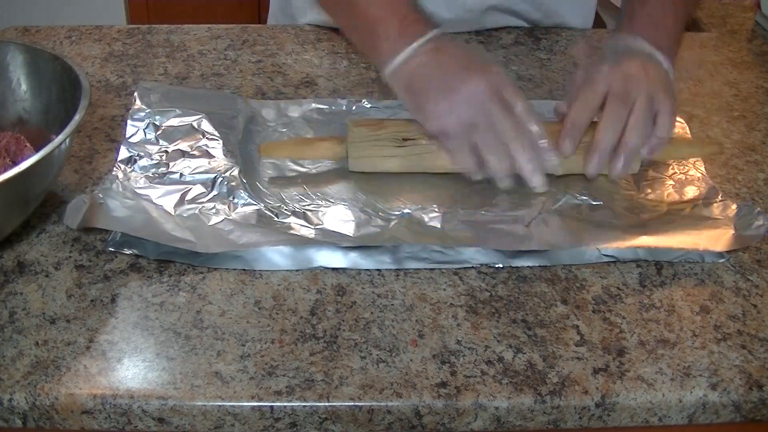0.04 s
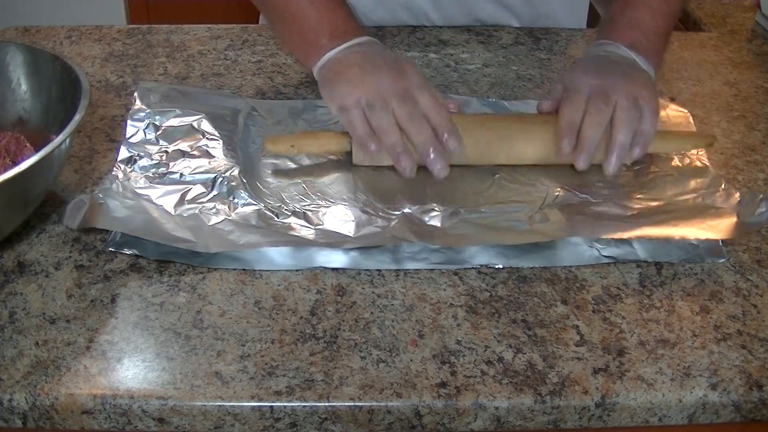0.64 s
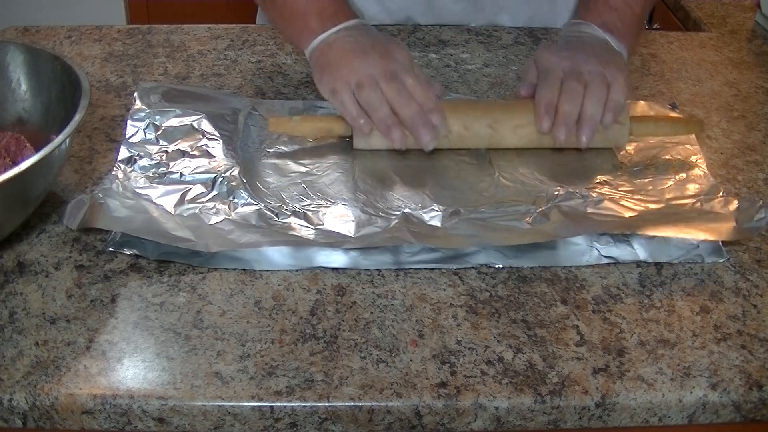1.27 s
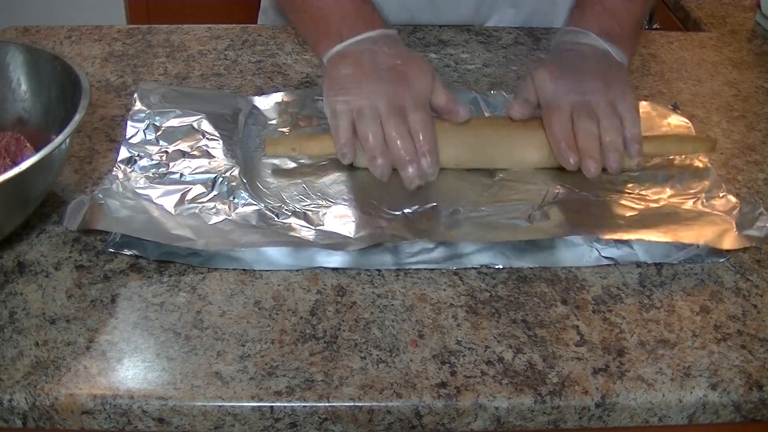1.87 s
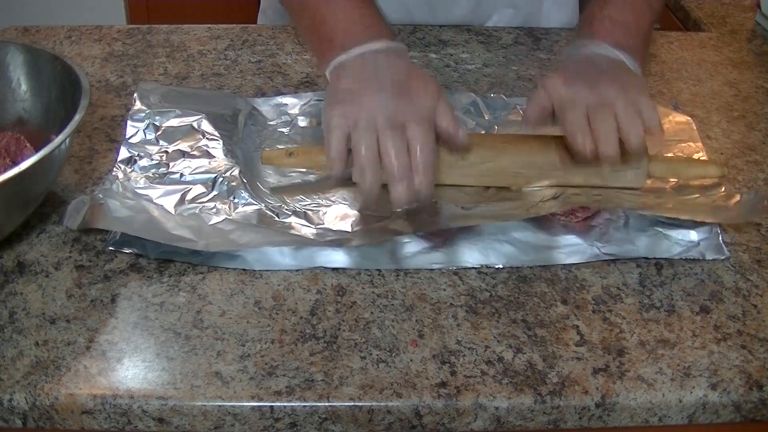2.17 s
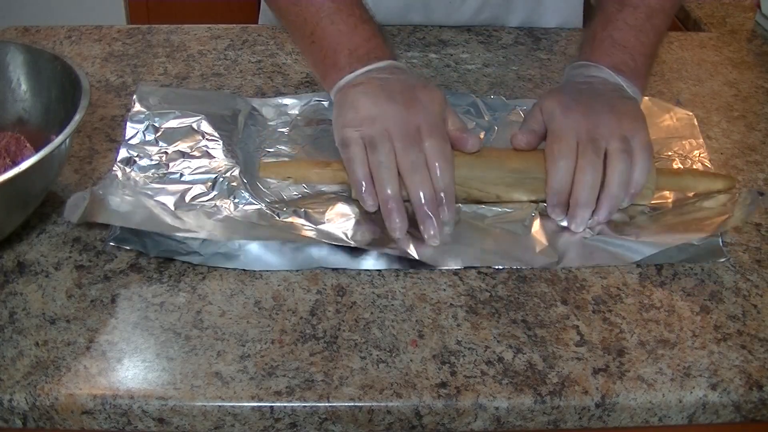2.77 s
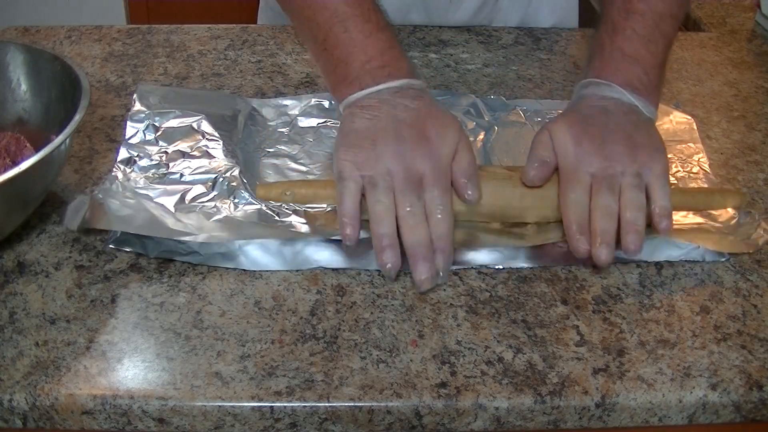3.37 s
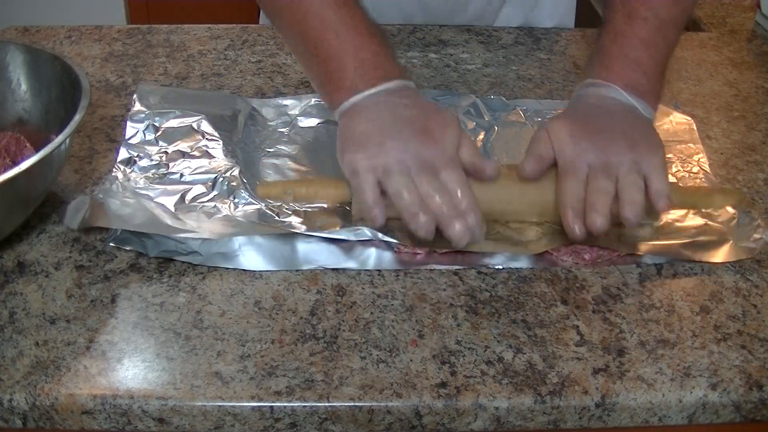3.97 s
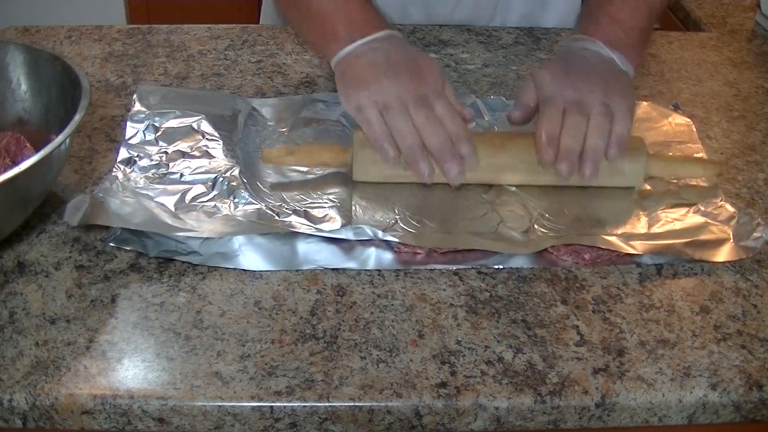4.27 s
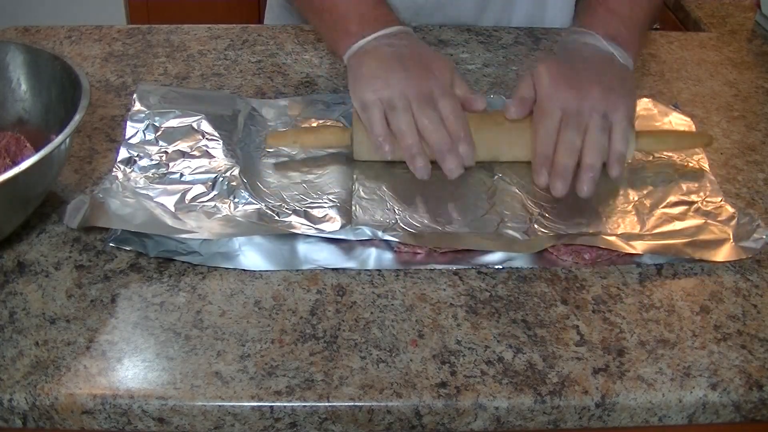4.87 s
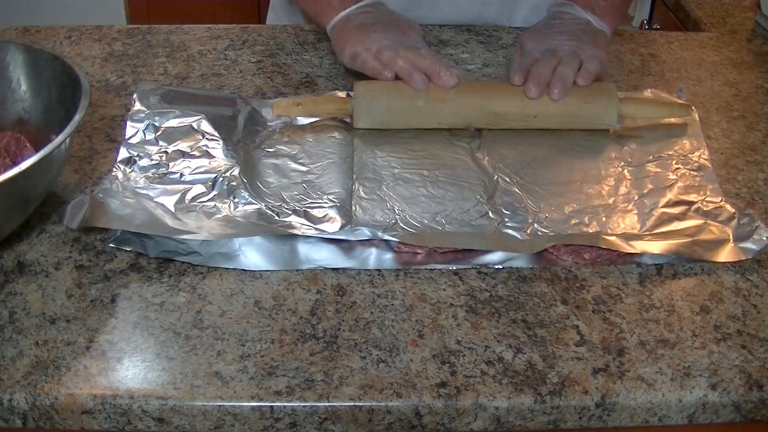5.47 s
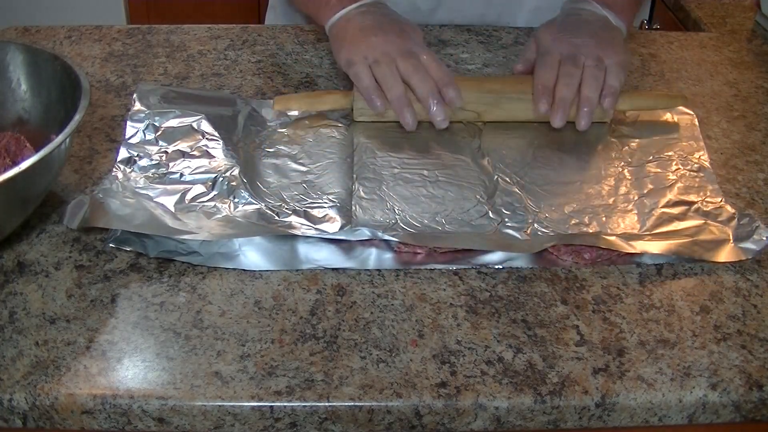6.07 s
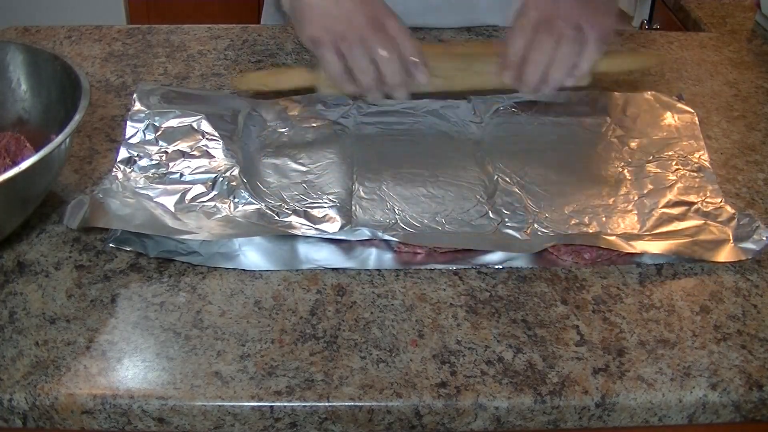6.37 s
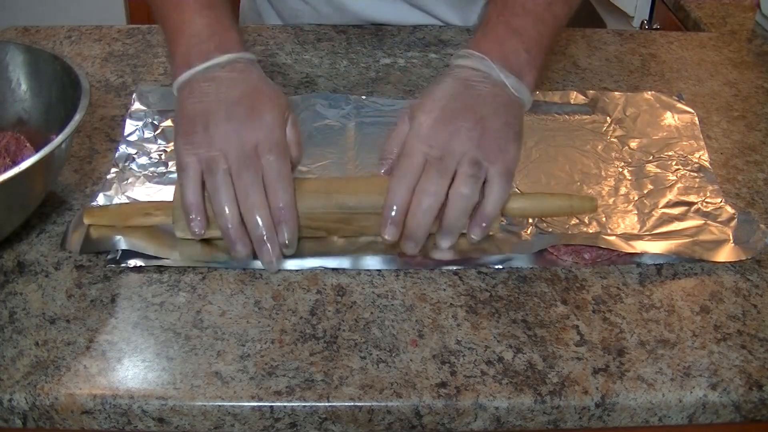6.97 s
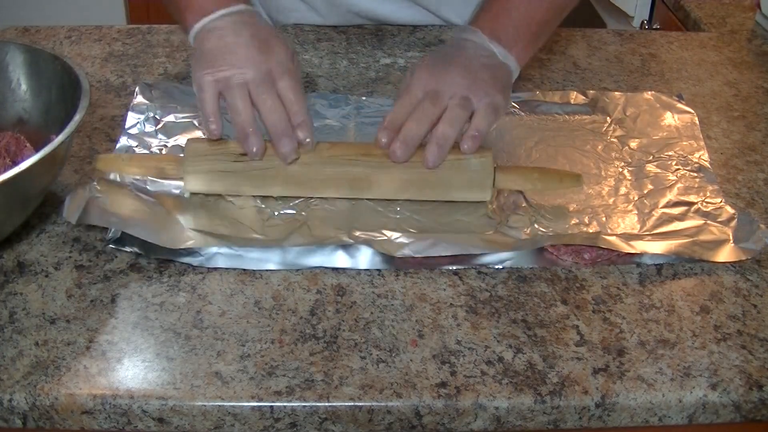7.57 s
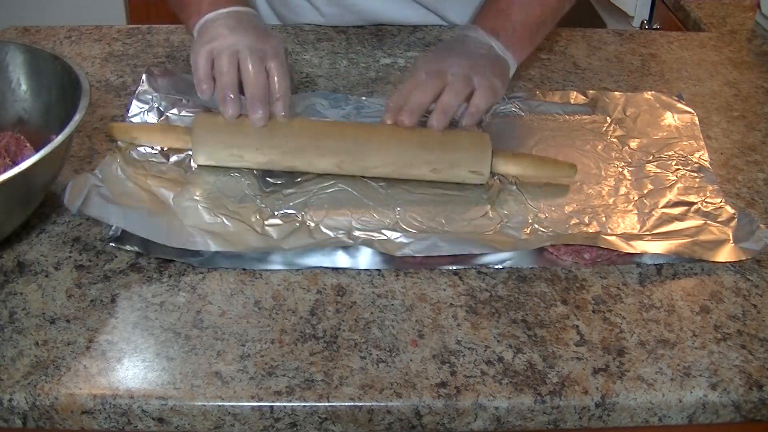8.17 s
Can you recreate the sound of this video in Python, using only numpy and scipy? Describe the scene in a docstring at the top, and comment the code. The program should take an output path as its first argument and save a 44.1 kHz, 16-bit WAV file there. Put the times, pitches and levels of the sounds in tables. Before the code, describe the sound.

Close to the microphone, aluminium foil crinkles in uneven surges as a rolling pin presses meat flat on a kitchen counter. Creases click and buckle, with a quiet wet crackle and a few soft bumps of the pin. Near the end the pin lifts for half a second, then comes down and the crinkling resumes. A fan runs quietly throughout, and hard walls add a slight echo.

```python
"""A wooden rolling pin works meat between two sheets of aluminium foil on a kitchen counter.
From the first push, each stroke crinkles the foil in showers of tiny crease flips; the sheet buckles,
snaps and squeaks, the meat squelches and pops beneath it, and now and then the pin bumps down.
At 6.3 s the pin lifts and the crinkle stops; half a second later it lands for a few last strokes.
A fan runs steadily throughout, and the hard kitchen walls echo the work."""
import sys
import numpy as np
from scipy import signal
from scipy.fft import rfft, irfft
from scipy.io import wavfile
from scipy.ndimage import uniform_filter1d

SR = 44100
rng = np.random.default_rng(int(sys.argv[2]) if len(sys.argv) > 2 else 0)


def wav_record(signal):
    """Record a signal, one row per channel, as 16-bit PCM in the file named by sys.argv[1]."""
    frames = np.transpose(np.atleast_2d(signal))
    bounded = np.clip(frames, -1, 1)
    # unit amplitude maps onto the largest positive 16-bit level
    quanta = np.round(bounded * 32767).astype(np.int16)
    wavfile.write(sys.argv[1], SR, quanta)


N = 362943
TIME = np.arange(N) / SR
SIDES = np.array([[1], [-1]])  # plus on the left, minus on the right
# the ring of the foil sheet: f/Hz, level/dB
FOIL_RING = [(60, -32), (130, -26), (280, -61), (500, -22), (1000, -13.5), (1500, -7.5), (2200, -3),
             (3500, -3.5), (4600, -2), (5700, -1.5), (6600, -4), (10200, -1.2), (12000, -6.5),
             (15000, -18.5)]


def amp(db):
    """Decibels to gain."""
    return 10 ** (np.asarray(db) / 20)


def unit_rms(x):
    """Scales to an rms of one."""
    return x / np.sqrt(np.mean(x ** 2) + 1e-20)


def curve_at(points, hz):
    """Reads a curve on a log-frequency axis."""
    f, value = np.transpose(points)
    return np.interp(np.log(hz + 1), np.log(f + 1), value)


def add(mix, s, sound):
    """Mixes a sound in at s seconds."""
    part = mix[:, max(round(s * SR), 0):][:, :sound.shape[-1]]
    part += sound[..., :part.shape[1]]


def coloured(x, spectrum, size=2048):
    """Minimum-phase EQ that keeps the power of white noise."""
    log_gain = np.log(amp(curve_at(spectrum, abs(np.fft.fftfreq(size, 1 / SR)))))
    taps = np.fft.ifft(np.exp(np.conj(signal.hilbert(log_gain)))).real[:size // 2]
    return signal.oaconvolve(x, taps[None] / np.linalg.norm(taps), axes=1)[:, :x.shape[1]]


def brightened(x, treble_db, split_hz=7500):
    """Fine creases ring high, broad folds lower: sets the treble's share of the power."""
    low = signal.sosfiltfilt(signal.butter(2, split_hz, fs=SR, output="sos"), x)
    high = x - low
    share = np.clip(amp(treble_db) ** 2, .02, .9)
    return (np.sqrt(1 - share) * low / low.std() + np.sqrt(share) * high / high.std()) * x.std()


def click(hz, cycles, size=400):
    """A tiny tone burst that peaks after the given cycles and dies at once."""
    turns = np.arange(size) / SR * hz
    return np.cos(2 * np.pi * (turns - cycles)) * (turns / cycles * np.exp(1 - turns / cycles)) ** 2


def crinkle(level_db=-2.5):
    """The foil creases under the moving pin."""
    db, treble_db, _ = rolling()
    activity = avalanches(per_s=80, spread_db=5, length_s=0.0085, steady=0.4)
    flips = shower(activity, per_s=5500, spread_db=3, crack_s=0.00014, flutter_s=0.00083, pan_db=1)
    grains = coloured(flips, FOIL_RING) + ticks()
    flare_db = 2.9 * np.log(activity)  # a strong avalanche flips finer creases and sounds brighter
    return brightened(grains, treble_db + flare_db) * amp(db + level_db)


def rolling(lift_s=6.3, land_s=6.805, turning_db=-60, seep_db=-57):
    """The pin's strokes ride crinkle level, treble share and squelch level (dB); the strongest leads."""
    # pushes and pulls: start/s, hardest press/s, end/s, crinkle/dB, swell/dB, treble share/dB, squelch/dB
    strokes = [(0.0, 0.096, 0.24, -33, 9, -3, -48), (0.451, 0.582, 0.91, -36.5, 4.5, -4.5, -55.5),
               (0.756, 0.786, 0.9, -31.5, 7.5, -3.5, -50), (1.252, 1.399, 1.46, -27.5, 16, -3.5, -44.5),
               (1.446, 1.492, 1.624, -32, 11, -3, -49), (1.823, 2.069, 2.146, -24, 12, -3.5, -46.5),
               (2.418, 2.53, 2.6, -30.5, 14.5, -4, -46.5), (2.54, 2.554, 2.77, -24.5, 3.5, -2.5, -50),
               (2.854, 3.275, 3.456, -30, 4, -4, -51.5), (3.56, 3.79, 3.836, -38.5, 3, -3, -51.5),
               (3.98, 4.276, 4.44, -36, 7.5, -2.5, -48.5), (4.397, 4.437, 4.56, -30, 21.5, -1.5, -47.5),
               (4.878, 5.08, 5.28, -35.5, 1.5, -3.5, -52), (5.246, 5.582, 5.59, -35, 3, -5, -51),
               (5.963, 5.98, 6.09, -32, 11.5, -4, -47), (6.834, 6.914, 7.037, -27, 9, -1.5, -41.5),
               (7.181, 7.27, 7.42, -34.5, 0.5, -3.5, -51), (7.457, 7.517, 7.5, -27, 7, -2.5, -47),
               (7.797, 7.815, 7.885, -33.5, 9, -3.5, -58), (7.99, 8.063, 8.18, -30.5, 2.5, -3.5, -45.5)]
    pressure = np.array([press(start, peak, end, swell) for start, peak, end, _, swell, _, _ in strokes])
    _, _, _, foil_db, _, treble_db, squelch_db = np.transpose(strokes)
    foil = foil_db[:, None] + pressure
    treble = treble_db[:, None] + 0.18 * np.maximum(pressure, -30)  # duller as the hands ease off
    lead_treble = treble[foil.argmax(0), np.arange(N)]
    squelch = squelch_db[:, None] + 0.58 * pressure  # soft meat follows the pressure only in part
    lifted = (TIME > lift_s) & (TIME < land_s)
    # between strokes the foil stirs faintly as the pin turns round, and the meat seeps
    crinkle_db = np.where(lifted, -np.inf, np.maximum(foil.max(0), turning_db))
    meat_db = np.where(lifted, seep_db, np.maximum(squelch.max(0), seep_db))
    return crinkle_db, uniform_filter1d(lead_treble, size=800), meat_db


def press(start, hardest, end, swell_db, wake_db_per_s=328, settle_db_per_s=143):
    """One stroke's envelope in dB: the hands lean in and ease off, then the foil settles."""
    held = np.interp(TIME, [start, hardest, end], [-swell_db, 0, -swell_db])
    attack = wake_db_per_s * np.maximum(start - TIME, 0)
    release = settle_db_per_s * np.maximum(TIME - end, 0)
    return held - attack - release


def avalanches(per_s, spread_db, length_s, steady):
    """Creases set each other off: the activity leaps at random moments and runs out."""
    sizes = amp(spread_db * np.minimum(rng.exponential(1, N), 2.3))
    kicks = sizes ** 2 * (rng.random(N) < per_s / SR)
    power = signal.lfilter([1], [1, -np.exp(-2 / (length_s * SR))], kicks)
    return np.sqrt(power / power.mean() + steady)


def shower(activity, per_s, spread_db, crack_s, flutter_s, pan_db, spots=40, window=3000):
    """Flips at random moments, mostly tiny and a few large, from many spots on the sheet."""
    out = np.zeros((2, N))
    for _ in range(spots):
        sizes = np.zeros(N)
        at = np.flatnonzero(rng.random(N) < per_s / spots / SR)
        sizes[at] = amp(spread_db * np.minimum(rng.exponential(1, N)[at], 4)) * activity[at]
        grain = flip(crack_s * rng.uniform(0.45, 1.6), flutter_s, flutter_db=-10.5, width=0.44)
        pan = amp(pan_db * rng.uniform(-0.93, 1) * SIDES)
        out += signal.oaconvolve(sizes[None], grain, axes=1)[:, :N] * pan
    # the pin feeds in energy at its own pace, however it is shared among the creases
    power = uniform_filter1d(uniform_filter1d((out ** 2).mean(0), window), window)
    return out / np.sqrt(abs(power) + 1e-9)


def flip(crack_s, flutter_s, flutter_db, width, size=700):
    """One crease flips: a centred crack, then a wider flutter of the sheet."""
    t = np.arange(size) / SR
    crack, flutter, side = rng.standard_normal((3, size))
    sheet = amp(flutter_db) * np.exp(-t / flutter_s) * (flutter + width * side * SIDES)
    grain = crack * np.exp(-t / crack_s) + sheet
    return grain / np.sqrt(np.sum(grain ** 2) / 2)


def ticks(level_db=8, spread_db=1.5, low_hz=3500, high_hz=11000, count=200):
    """Lone, very short crease flips that stand out of the crinkle."""
    out = np.zeros((2, N))
    for when, size, pitch, pan in rng.random((count, 4)):
        db = level_db + spread_db * min(-np.log(1 - size), 3) + 3 * (pan - .5) * SIDES
        hz = low_hz * (high_hz / low_hz) ** pitch
        add(out, when * N / SR, amp(db) * click(hz, cycles=0.73))
    return out


def buckles(level_db=1, spread_db=3, flips_per_s=9000, attack_s=0.00018, size=4400):
    """A patch of foil gives way: a large avalanche of flips that starts at once and runs out."""
    # collapsing patches: t/s, level/dB, treble share/dB, decay/s
    patches = [(.002, -24, -4.5, 0.014), (0.075, -24.5, -1, 0.024), (.384, -38.5, -2.5, 0.0063),
               (0.484, -31, -7, 0.0056), (0.545, -27.5, -1.5, 0.0048), (0.909, -31.5, -2.5, 0.0078),
               (1.101, -38.5, -2.5, 0.011), (1.126, -36, -4.5, 0.019), (1.237, -33, -5, 0.0064),
               (1.706, -37.5, -7, 0.0083), (1.844, -38, -13, .006), (1.892, -26, -1, 0.021),
               (1.975, -27.5, -10, .015), (2.044, -26.5, 1, 0.012), (2.196, -28, -2, 0.013),
               (2.408, -30.5, -2.5, .016), (2.541, -20.5, -1, 0.031), (2.633, -25, -3, 0.0087),
               (2.671, -33, -4, 0.0059), (2.771, -20, -1.5, .009), (2.967, -30, -1.5, 0.045),
               (3.151, -24.5, -1, .012), (3.309, -22.5, -4, 0.0094), (3.419, -23.5, -1.5, 0.021),
               (3.713, -24.5, -0.5, 0.0064), (3.749, -27.5, -4, 0.013), (3.786, -30, 0, 0.017),
               (3.883, -26, -1.5, 0.0064), (3.957, -21.5, -1.5, 0.014), (4.212, -28, -1.5, 0.0058),
               (4.507, -23, -0.5, 0.008), (4.608, -35, 0.5, .006), (4.78, -48, -1, 0.018),
               (5.006, -25, 0.5, 0.0056), (5.026, -26.5, -1.5, .014), (5.742, -34.5, -1, 0.0047),
               (5.841, -45, -7, 0.012), (6.229, -42, -4.5, 0.012), (6.806, -30.5, 1, .015),
               (6.818, -21.5, -1, 0.024), (6.909, -21, -0.5, 0.013), (7.062, -27.5, -2, 0.0092),
               (7.145, -29, -1.5, 0.01), (7.226, -25, -1.5, 0.0056), (7.593, -32.5, 0, 0.0073),
               (7.808, -27, -1, 0.01), (7.918, -27.5, -2.5, 0.0038)]
    out, t = np.zeros((2, N)), np.arange(size) / SR
    for s, db, treble_db, decay_s in patches:
        sizes = amp(spread_db * np.minimum(rng.exponential(1, size), 4))
        sizes *= rng.random(size) < flips_per_s / SR
        mid, side = sizes * rng.standard_normal((2, size))
        burst = unit_rms(brightened(coloured(mid + 0.24 * side * SIDES, FOIL_RING), treble_db))
        envelope = np.exp(-t / decay_s) * (1 - np.exp(-t / attack_s))
        add(out, s, amp(db + level_db) * burst * envelope)
    return out


def snaps(click_db=-3, sheet_db=4):
    """Single stiff creases flip: a sharp click and a brief shiver of the sheet."""
    # stiff creases: t/s, level/dB, f/Hz
    creases = [(0.5422, -13.5, 6500), (1.72, -17, 8250), (1.7414, -16, 9200), (1.79, -19, 6400),
               (1.8477, -14, 6760), (2.609, -17, 6800), (2.89, -18, 8100), (3.243, -17, 9400),
               (3.5226, -12.5, 4050), (3.5449, -10.5, 3600), (3.5741, -15.5, 3800), (3.381, -13, 8100),
               (3.6697, -20, 7300), (3.91, -13, 9000), (4.3397, -12.5, 10500), (4.824, -23.5, 8900),
               (4.834, -23, 8000), (5.9333, -21, 6214), (6.0492, -15.5, 7750), (6.489, -35, 6500),
               (7.1901, -14, 5900), (7.229, -13, 8300)]
    out = np.zeros((2, N))
    for s, db, hz in creases:
        shiver = coloured(flip(crack_s=0.00016, flutter_s=0.0013, flutter_db=-9.5, width=0.14), FOIL_RING)
        add(out, s, amp(db + click_db) * click(hz, cycles=0.98))
        add(out, s, amp(db + sheet_db) * shiver)
    return out


def squeaks(wobble=0.053, attack_s=0.00073, size=3000):
    """Brief stick and slip of foil on foil, its pitch unsteady."""
    # foil rubs: t/s, level/dB, f/Hz, decay/s
    rubs = [(0.025, -36, 2740, .007), (0.033, -35, 2265, .01), (0.072, -30.5, 2295, 0.0088),
            (1.234, -37.5, 2810, 0.0093), (3.55, -33, 3130, .003), (3.573, -36, 3500, 0.0044),
            (6.488, -53, 4760, 0.028)]
    out, t = np.zeros((2, N)), np.arange(size) / SR
    for s, db, hz, decay_s in rubs:
        jitter = unit_rms(uniform_filter1d(rng.standard_normal(size), size=100))
        tone = np.sqrt(2) * np.sin(2 * np.pi * np.cumsum(hz * (1 + wobble * jitter)) / SR)
        envelope = np.exp(-t / decay_s) * (1 - np.exp(-t / attack_s))
        add(out, s, amp(db) * tone * envelope)
    return out


def meat(level_db=-3, pop_db=2):
    """Wet crackle of the squeezed meat, with short pops as air pockets burst."""
    # tone of the squelch: f/Hz, level/dB
    squelch_eq = [(60, -41), (200, -31), (400, -10), (750, 0.5), (1300, 0), (2000, -4), (4000, -25),
                  (12000, -64)]
    # bursting air pockets: t/s, level/dB, f/Hz
    pops = [(0.645, -27, 2000), (1.976, -25, 1980), (2.059, -20.5, 2240), (2.872, -24.5, 2470),
            (4.017, -23, 1890), (5.055, -24.5, 1930), (5.574, -32.5, 1050), (6.985, -22.5, 2000),
            (7.038, -22.5, 1420)]
    _, _, squelch_db = rolling()
    activity = avalanches(per_s=60, spread_db=3, length_s=0.0085, steady=0.13)
    crackle = shower(activity, per_s=2000, spread_db=1, crack_s=0.00036, flutter_s=0.00092,
                     pan_db=2.5, spots=16)
    out = coloured(crackle, squelch_eq) * amp(squelch_db + level_db)
    for s, db, hz in pops:
        add(out, s, amp(db + pop_db) * click(hz, cycles=0.98))
    return out


def pin_bumps(level_db=1, decay_s=0.018, attack_s=0.0013, size=8000):
    """The pin thuds on the counter, damped by the meat."""
    # thuds: t/s, level/dB, f/Hz
    thuds = [(0.017, -49, 241), (1.158, -51, 237), (2.406, -42.5, 212), (6.787, -59, 166),
             (6.955, -43.5, 318)]
    out, t = np.zeros((2, N)), np.arange(size) / SR
    envelope = np.exp(-t / decay_s) * (1 - np.exp(-t / attack_s))
    for s, db, hz in thuds:
        phase = 2 * np.pi * hz * t
        modes = np.sin(phase) + 0.7 * np.sin(0.79 * phase) + .5 * np.sin(1.2 * phase)
        add(out, s, amp(db + level_db) * modes * envelope)
    return out


def kitchen(x, turns_per_s=17, paths=5):
    """Each part of the sheet reaches the walls by its own paths, so the reverb keeps shifting."""
    out = np.zeros((2, N))
    for path in range(paths):
        away = (TIME * turns_per_s * paths - path + 1) % paths - 1
        crossfade = np.cos(np.pi / 2 * np.minimum(away, 1))
        out += signal.fftconvolve(x * crossfade, echoes(), axes=1)[:, :N]
    return out


def echoes(early_db=-9, tail_db=-3.5, early_s=.012, build_s=0.0029, count=8):
    """A few reflections off counter and cupboards, then a tail that dies band by band."""
    # ring of the hard walls: f/Hz, t60/s
    reverb_times = [(200, 0.28), (1000, 0.4), (3500, 0.53), (9000, 0.28), (15000, 0.21)]
    hz, t, noise = signal.stft(rng.standard_normal((2, SR * 3 // 4)), SR, nperseg=256)
    decay = amp(-60 * t / curve_at(reverb_times, hz)[:, None])
    tail = signal.istft(noise * decay * (1 - np.exp(-t / build_s)), SR, nperseg=256)[1]
    tail = tail + 0.34 * tail[::-1]  # the two microphones sit close together
    response = amp(tail_db) * tail / np.linalg.norm(tail[0])
    for delay, left, right in rng.random((count, 3)):
        reflection = amp(early_db) / np.sqrt(count) * (.5 + np.array([[left], [right]]))
        add(response, .001 + early_s * delay, reflection * rng.choice([-1, 1]))
    return response


def fan(rush_db=-55.5, waver=0.579):
    """A steady bed of rushing air with a few faint wavering tones."""
    # tone of the rushing air: f/Hz, level/dB
    rush_eq = [(30, -39), (60, -19), (110, -18), (150, -11.5), (210, -13), (290, -3.5), (480, -1),
               (800, -5), (1400, -8.5), (2200, -12), (5000, -17.5), (9500, -20.5), (16000, -34)]
    # stereo image of the rush: f/Hz, left-right correlation
    image = [(60, -0.056), (130, -0.19), (290, 0.66), (640, 0.85), (1400, 0.69), (3100, -0.11), (7000, .45),
             (15000, .25)]
    # hum and whine: f/Hz, level/dB
    tones = [(160, -83), (354, -70), (471, -70.5), (587, -76), (689, -70.5), (1593, -71.5), (7354, -79.5),
             (8000, -88)]
    hz = np.fft.rfftfreq(N, 1 / SR)
    left, other = rfft(rng.standard_normal((2, N)))
    alike = curve_at(image, hz)
    right = alike * left + np.sqrt(1 - alike ** 2) * other
    air = irfft(np.array([left, right]) * amp(curve_at(rush_eq, hz)), N)
    out = amp(rush_db) * unit_rms(air)
    for tone_hz, db in tones:
        drift = waver * np.cumsum(rng.standard_normal(N)) / np.sqrt(SR)
        out += amp(db) * np.sqrt(2) * np.sin(2 * np.pi * (tone_hz * TIME + drift))
    return out


def scene():
    """Foil, meat and pin in the kitchen, over the fan."""
    near = crinkle() + buckles() + snaps() + squeaks() + meat() + pin_bumps()
    return near + kitchen(near) + fan()


def record(dry, cutoff_hz=16050):
    """A close pair of microphones, the right one a little louder; then a steep high cut."""
    # stereo width: f/Hz, side gain/dB
    width = [(60, 10), (130, -2.5), (300, 0.5), (600, 3), (1200, -1), (2200, -6.5), (4500, 0), (9000, 2),
             (13000, 4)]
    # stereo balance: f/Hz, left minus right/dB
    balance = [(100, -0.5), (400, -2.5), (1200, -2), (2400, -0.6), (4400, -3), (8000, -3), (15000, -0.5)]
    hz, spectrum = np.fft.rfftfreq(N, 1 / SR), rfft(dry)
    mid = spectrum.mean(0)
    side = (spectrum - mid) * amp(curve_at(width, hz))
    heard = irfft((mid + side) * amp(curve_at(balance, hz) * SIDES / 2), N)
    high_cut = signal.firwin(511, cutoff_hz, window=("kaiser", 9), fs=SR)
    return signal.oaconvolve(heard, high_cut[None], "same")


dry = scene()
out = record(dry)
wav_record(out)
```